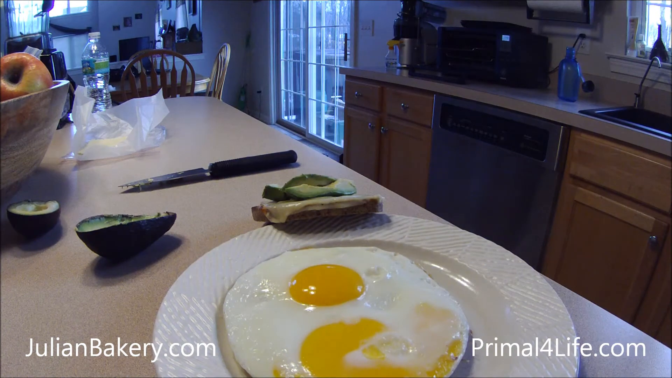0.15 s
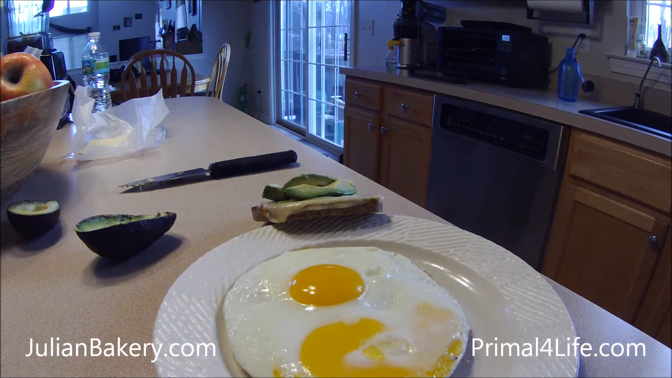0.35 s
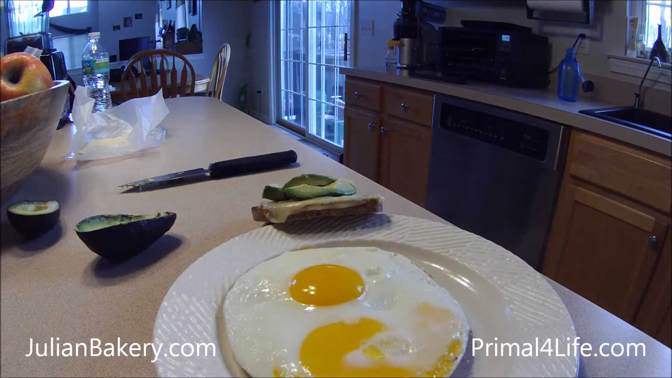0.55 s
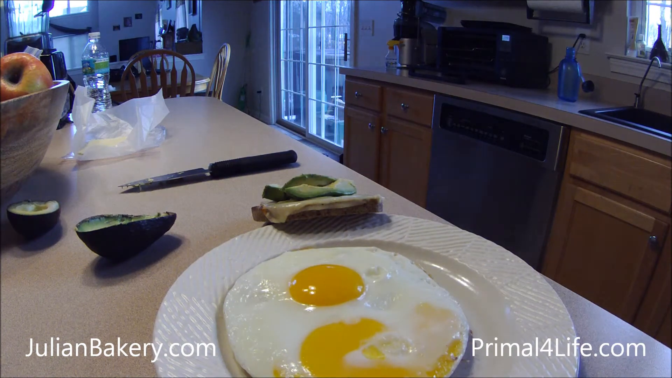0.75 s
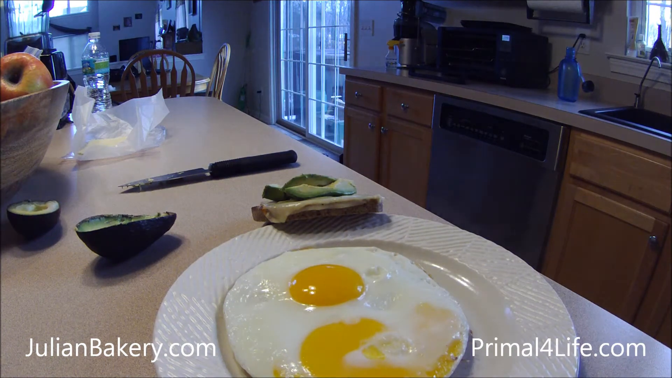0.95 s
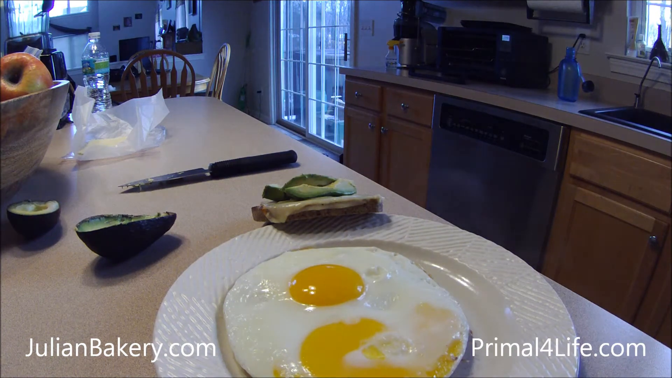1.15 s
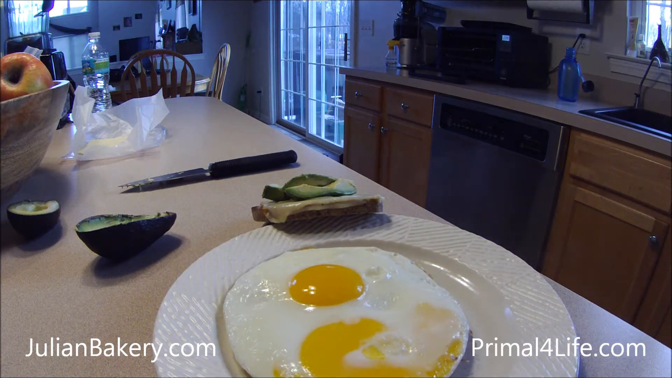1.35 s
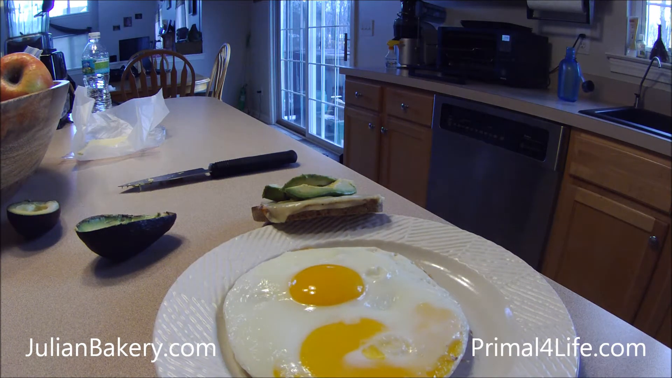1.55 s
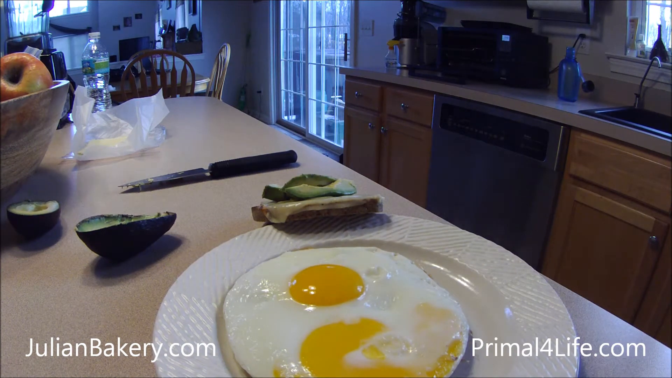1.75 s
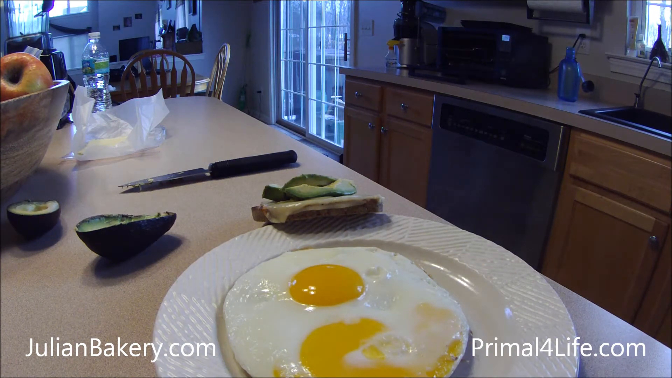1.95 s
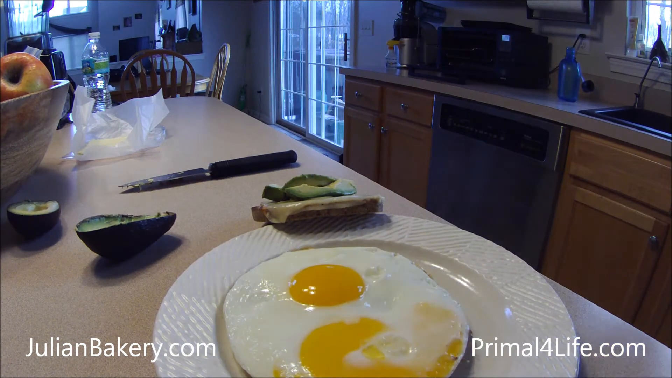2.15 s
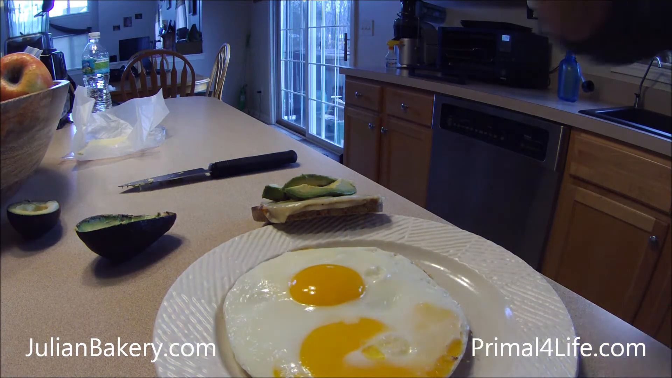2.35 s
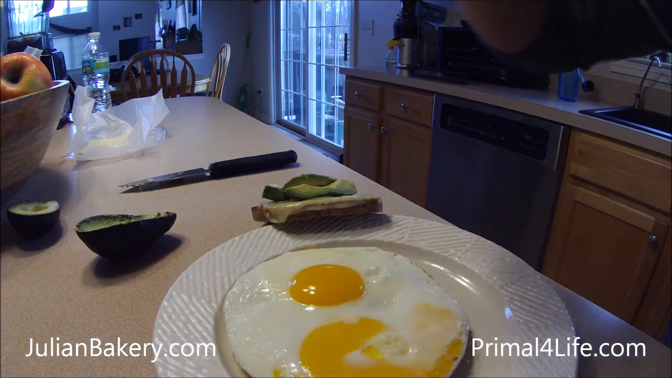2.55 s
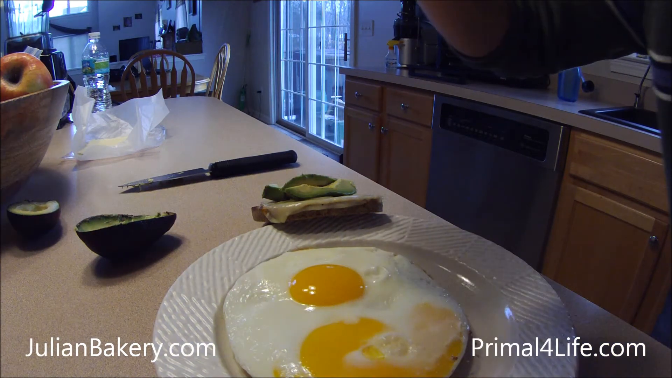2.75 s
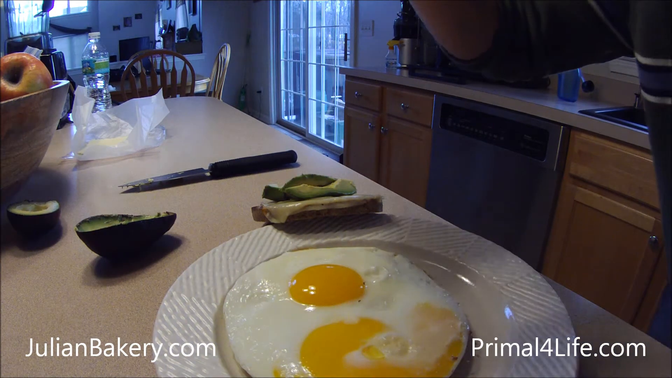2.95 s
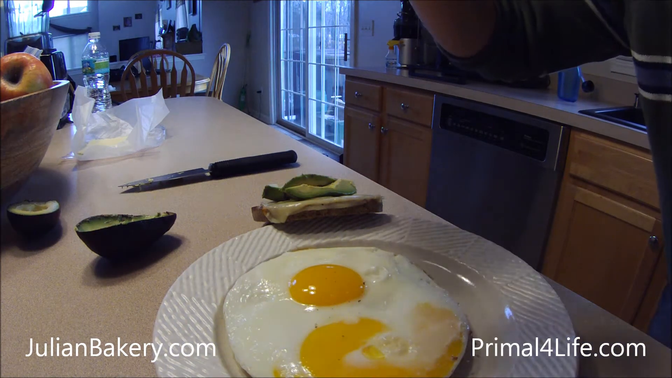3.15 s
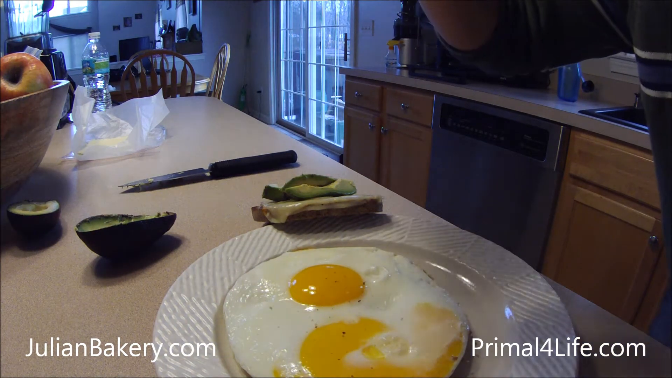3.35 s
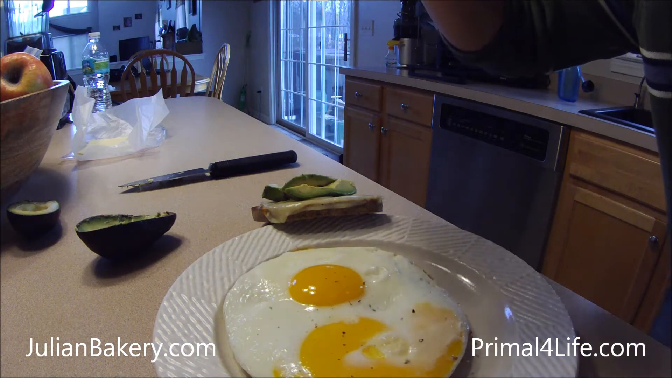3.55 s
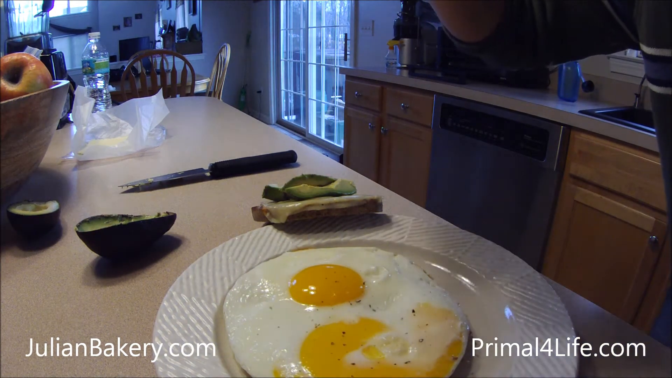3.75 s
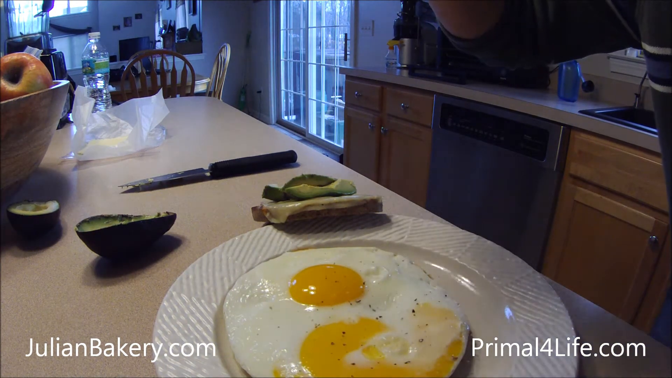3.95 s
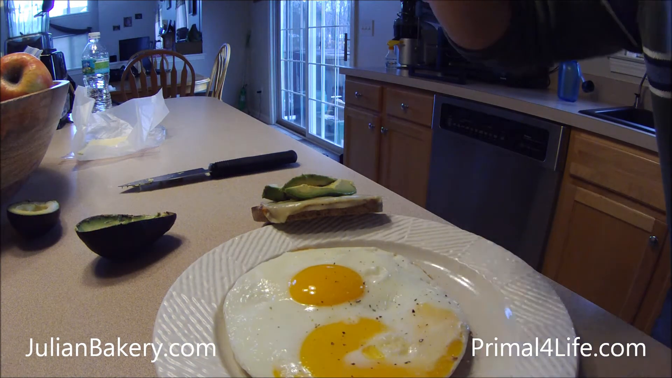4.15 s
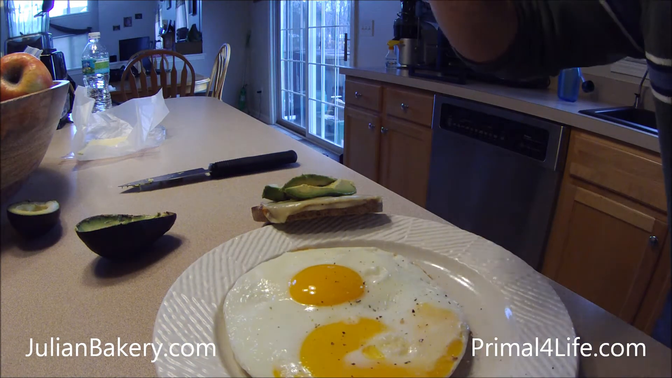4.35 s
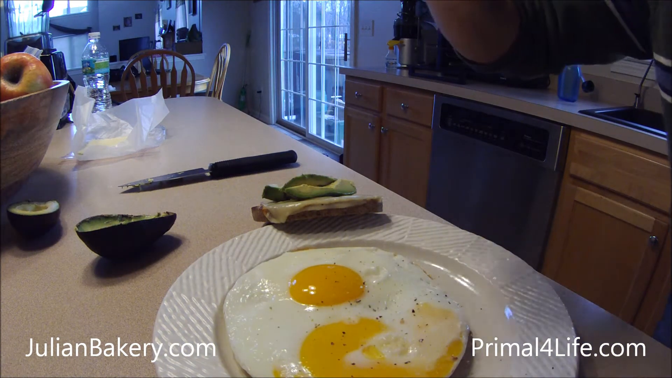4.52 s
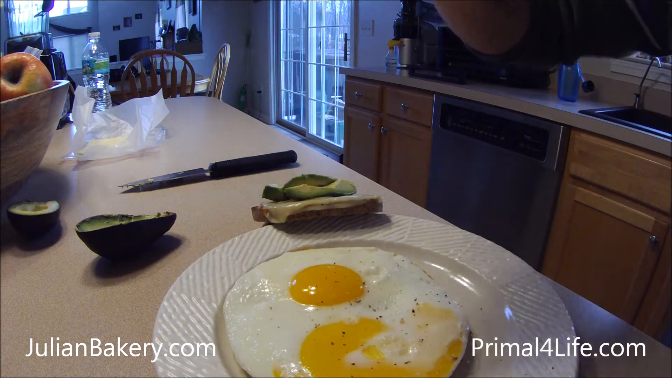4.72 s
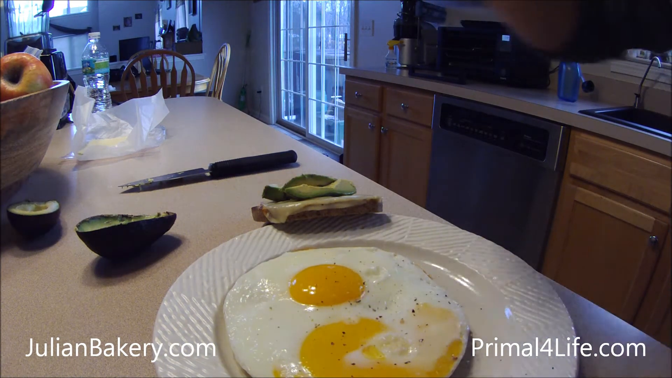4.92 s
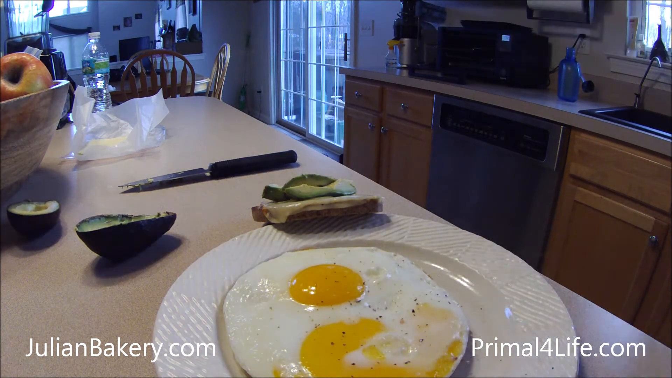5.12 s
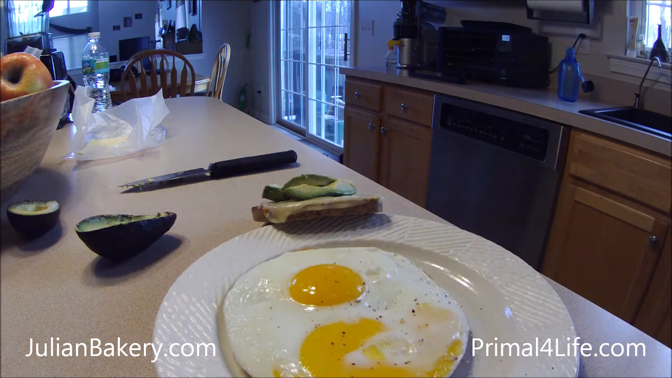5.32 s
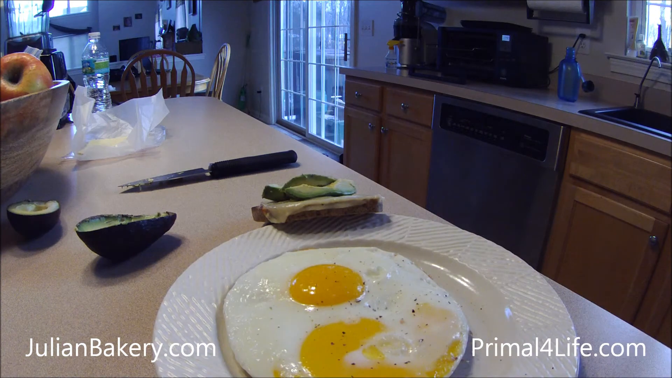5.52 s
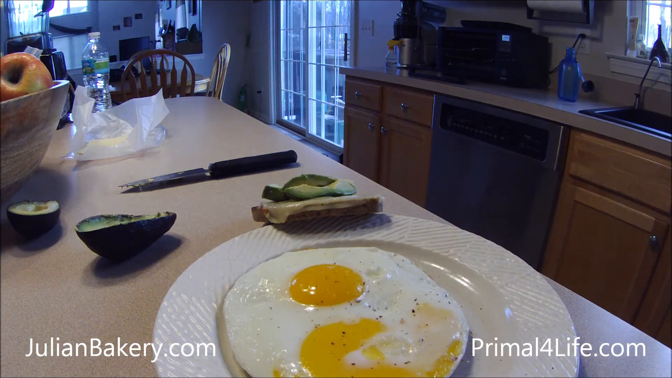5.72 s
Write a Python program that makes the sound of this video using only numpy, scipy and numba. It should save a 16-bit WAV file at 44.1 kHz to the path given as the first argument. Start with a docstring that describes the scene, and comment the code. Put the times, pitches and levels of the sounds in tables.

```python
"""Soft knocks come from across a small, fairly dry kitchen, where an appliance hums; then a pepper mill rasps close by.
Fried eggs are being seasoned: the mill is tipped, twisted in one long turn, shaken quickly and turned upright.
The knocks are noise bursts and fading tones; the hum is a few wavering tones over filtered noise.
The mill is made of countless tiny random impacts, which ring the resonances of its head and case.
Squeaks, cracking grains, a brushing sleeve and room reflections complete it."""
import sys
import numpy as np
from scipy import signal
from scipy.fft import rfft, irfft
from scipy.io import wavfile
from scipy.ndimage import uniform_filter1d, map_coordinates
from numba import njit

SR = 44100
rng = np.random.default_rng(int(sys.argv[2]) if len(sys.argv) > 2 else 0)


def digitize_waveform(pressure):
    """Quantize a signal to 16-bit integers and store it at the path in sys.argv[1].

    Rows of a 2-D input are taken as channels; values are limited to [-1, 1].
    """
    field = np.atleast_2d(pressure).T
    bounded = np.clip(field, -1, 1)
    quanta = np.round(bounded * 32767).astype(np.int16)
    wavfile.write(sys.argv[1], SR, quanta)


N = 254898
T = np.arange(N) / SR  # time of every sample, s

# shakes of the mill, a light backswing and a hard landing by turns:
# (t/s, hold/s, treble level/dB, then relative to it: body/dB, crisp top/dB, forerunning grains/dB;
# ring of the struck spot f/Hz, its relative level/dB); later trims shift the levels
SHAKE_STROKES = [(4.292, 0.012, -31, -10, -19, -20, 9300, -11),
                 (4.36, 0.018, -31.5, -5.5, -0.5, -10.5, 8800, -7),
                 (4.469, 0.02, -36, -8.5, -9, -7.5, 7900, -6),
                 (4.526, 0.026, -26, -4.5, -7, -19, 2460, -15),
                 (4.654, 0.011, -33.5, -6, -10, -19, 7900, -3),
                 (4.709, 0.017, -29, -3, -4, -6.5, 5100, -11),
                 (4.818, 0.02, -29.5, -11.5, -10, -16, 7700, -9),
                 (4.866, 0.033, -32, -1, -7, -13, 5040, -12)]


def undb(db):
    """Turn decibels into a gain."""
    return 10 ** (np.asarray(db) / 20)


def unit(x):
    """Scale a sound to rms 1."""
    return x / np.sqrt(np.mean(x ** 2))


def add(out, s, sound):
    """Mix a short sound in at time s."""
    i = max(int(s * SR), 0)
    out[i:i + len(sound)] += sound[:N - i]


def colour(x, points):
    """Shape the spectrum through (f/Hz, level/dB) points, with a filter that never rings ahead of the sound."""
    size = 4096
    hz, db = np.transpose(points)
    bins_hz = np.arange(size // 2 + 1) * SR / size
    log_gain = np.log(undb(np.interp(np.log(bins_hz + 1), np.log(hz), db)))
    # folding the cepstrum gives minimum phase
    cepstrum = irfft(log_gain)
    cepstrum[1:size // 2] *= 2
    cepstrum[size // 2 + 1:] = 0
    impulse = irfft(np.exp(rfft(cepstrum)))
    return signal.fftconvolve(x, impulse)[:len(x)]


@njit
def svf(x, hz, width):
    """State-variable band-pass whose centre may move every sample."""
    y, band, low = np.empty(len(x)), 0., 0.
    for i in range(len(x)):
        g = np.tan(np.pi * min(hz[i], .45 * SR) / SR)
        k = width / hz[i]
        v = (band + g * (x[i] - low)) / (1 + g * (g + k))
        band = 2 * v - band
        low = low + 2 * g * v
        y[i] = k * v
    return y


def resonate(x, hz, width):
    """Ring one resonance, fixed or moving, with gain 1 at its centre."""
    return svf(x + 1e-18, hz * np.ones(len(x)), float(width))


def walk(rate):
    """Wander smoothly and randomly with rms 1, passing `rate` random points a second."""
    knots = rng.standard_normal(2048)
    return unit(map_coordinates(knots, [T * rate], order=2, mode="wrap"))


def grains(per_s, scatter_db):
    """Tiny random impacts of uneven size; their power stays about 1 as the rate changes."""
    chance = np.clip(per_s / SR, 1e-4, 1)
    spread = np.clip(rng.standard_normal(N), -2, 2)
    sizes = unit(rng.choice([-1, 1], N) * undb(scatter_db * spread))
    return sizes * (rng.random(N) < chance) / np.sqrt(chance)


def chatter(hz, width):
    """Dense tiny contacts ring one resonance, rms 1."""
    contacts = grains(3000, scatter_db=2.5)
    return unit(resonate(resonate(contacts, hz, width), hz, 2 * width))


def background(tone_db=-55.0, flutter_per_s=20):
    """Steady room air and hiss are filtered noise; the appliance hums in wavering tones."""
    # spectrum of the room air: (f/Hz, relative level/dB)
    room_tone = [(15, -22), (25, -42), (43, -24), (116, -15), (193, -14.5), (227, -5.5), (260, -8.5),
                 (349, -11.5), (410, -16), (445, -13.5), (1170, -25), (1270, -23), (1410, -25.5),
                 (3830, -30), (15500, -38)]
    # appliance hum: (f/Hz, level/dB, unsteadiness 0-1)
    hum = [(59.2, -81, 0.3), (118.4, -72.5, 0.02), (225.6, -57, 0.57), (285, -73, 0.57), (449, -69, 0.8)]
    out = undb(tone_db) * unit(colour(rng.standard_normal(N), room_tone))
    for hz, db, unsteady in hum:
        wander = walk(flutter_per_s) + 1j * walk(flutter_per_s)  # sways both strength and phase
        swing = 1 - unsteady + unsteady * wander
        out = out + undb(db) * unit(np.real(swing * np.exp(2j * np.pi * hz * T)))
    return out


def knocks(thud_db=-2, thud_s=0.012, contact_s=0.0023, panel_db=-1,
           clack_hz=800, clack_width=600, clack_s=0.012,
           rattle_hz=1750, rattle_width=750, rattle_s=0.027):
    """Soft blows on wooden cupboards: a dull thud, a hollow clack, the panel's short ring and a loose door's rattle."""
    # blows: (t/s, level/dB, hardness: treble tilt/dB per octave,
    # panel ring/dB, hollow clack/dB, rattle/dB); the parts are relative levels ahead of the thud and panel trims
    blows = [(.008, -49, -2, 2, 3.5, -26), (.68, -56.5, 1.5, 5.5, -10, -9),
             (1.1863, -43, 2.5, -5, -17, -11), (1.1932, -29, -1.6, 0, -18, -16.5),
             (1.228, -49, -4, 0, -20, -18), (1.419, -47, 3, 3.5, 2, -5.5)]
    # tones of the cupboard panel: (f/Hz, relative level/dB, fall by 60 dB/s)
    panel_tones = [(249.6, -2.5, 0.12), (287, 2, 0.063), (338, -19, 0.044), (439.5, -1, 0.097),
                   (465, -7, .11), (586, -10.5, 0.096), (862, -13, 0.074), (1126, -12, 0.1),
                   (1387, -13.5, 0.12), (1597, -16, 0.15), (1710, -14, .16), (2000, -28, 0.12),
                   (2730, -19, 0.04)]
    # spectrum of the thud ahead of the hardness tilt: (f/Hz, relative level/dB)
    thud_bands = [(170, -45), (235, 2.5), (320, -3.5), (480, 0), (650, -14), (1000, -8.5), (1900, -17),
                  (3000, -21), (6000, -27), (11000, -36), (16000, -42)]
    out, t = np.zeros(N), T[:SR // 2]
    for s, db, hard_db, ring_db, clack_db, rattle_db in blows:
        ring = 0
        for hz, mode_db, t60 in panel_tones:
            gain = undb(mode_db + hard_db * np.log2(hz / 400))
            ring = ring + gain * np.sin(2 * np.pi * hz * t) * np.exp(-np.log(1000) * t / t60)
        # the tilt stops growing above 2 kHz
        tilted = [(hz, band_db + hard_db * np.log2(min(hz, 2000) / 400)) for hz, band_db in thud_bands]
        thud = unit(colour(rng.standard_normal(len(t)), tilted)) * np.exp(-t / thud_s)
        clack = undb(clack_db) * chatter(clack_hz, clack_width)[:len(t)] * np.exp(-t / clack_s)
        rattle = undb(rattle_db) * chatter(rattle_hz, rattle_width)[:len(t)] * np.exp(-t / rattle_s)
        blow = undb(ring_db + panel_db) * ring + undb(thud_db) * thud + clack + rattle
        soft_start = 1 - np.exp(-t / contact_s)
        add(out, s, undb(db) * blow * soft_start)
    return out


def kitchen(x, t60=0.37, treble_t60=0.13):
    """Diffuse reflections from cupboards and walls: fading noise whose treble dies first."""
    t = T[:SR // 2]
    noise = rng.standard_normal(len(t))
    low = signal.sosfilt(signal.butter(1, 3000, fs=SR, output="sos"), noise)
    low_tail = low * np.exp(-np.log(1000) * t / t60)
    treble_tail = (noise - low) * np.exp(-np.log(1000) * t / treble_t60)
    tail = (low_tail + treble_tail) * (t > .004)  # reflections arrive after 4 ms
    return signal.fftconvolve(x, tail / np.sqrt(np.sum(tail ** 2)))[:N]


def surge(s, db, rise, fall):
    """Power of one swell, such as a throw of grains: it peaks at time s and dies away."""
    distance = (T - s) / np.where(T < s, rise, fall)
    return undb(db) ** 2 * np.exp(-np.minimum(distance ** 2, 10 * 10))


def sleeve(level_db=-42.0, at_s=5.116, rise_s=0.004, fall_s=0.042):
    """Cloth brushes past as the arm draws back: dense soft contacts in one swell."""
    # spectrum of the cloth: (f/Hz, relative level/dB)
    cloth = [(100, -22), (300, -11), (600, -9.5), (900, -4.5), (1350, 0.5), (1800, -2.5), (2500, -4),
             (6000, -25)]
    brush = unit(colour(grains(2500, scatter_db=0.5), cloth))
    return np.sqrt(surge(at_s, level_db, rise_s, fall_s)) * brush


def loose_grains(stir, level_db, per_s, ring_hz, ring_width, stray_s=0.056, click_s=0.0011):
    """Lone grains click at random wherever the load is stirred, a little ahead of and behind the bulk."""
    t = T[:SR // 100]
    hits = grains(per_s, scatter_db=-1.0)
    click_power = signal.fftconvolve(hits ** 2, np.exp(-2 * t / click_s))[:N]
    clicks = resonate(np.sqrt(np.abs(click_power)) * rng.standard_normal(N), ring_hz, ring_width)
    return undb(level_db) * uniform_filter1d(stir, int(stray_s * SR)) * unit(clicks)


def landing(s, hold_s, db, attack_s=0.0018, release_s=0.0096):
    """Strength of the bulk of the grains landing: attack, hold, release."""
    before = np.maximum(s - T, 0) / attack_s
    after = np.maximum(T - s - hold_s, 0) / release_s
    return undb(db) * np.exp(-before - after)


def throws(fall_over_swell=1.18, forerun_s=0.012):
    """Power of the grains' spray (treble), thump on the case (body) and crisp top, over tilts, jolts and shakes."""
    # slides of grains as the mill is tilted, and single short jolts that throw them (2.561, 2.729, 4.173 s):
    # (t/s, treble level/dB, swell/s, then relative to the treble: body/dB, crisp top/dB); later trims shift the levels
    tilts_and_jolts = [(1.925, -57, 0.03, -4.5, -22), (2.112, -49.5, 0.03, -8, -15),
                       (2.401, -32, 0.025, -11, -17), (2.456, -34, 0.013, -2.5, 2),
                       (2.5, -34.5, 0.017, -10, -6), (2.561, -29.5, 0.024, -6.5, -4),
                       (2.729, -37.5, 0.01, -2.5, 0), (4.173, -33, 0.007, -2, -1.5),
                       (5.04, -43, 0.046, -8, -9), (5.146, -37.5, 0.043, -4.5, -9)]
    strokes = []
    for s, db, swell_s, body_db, top_db in tilts_and_jolts:
        power = surge(s, db, swell_s, fall_over_swell * swell_s)  # falls a little slower than it swells
        strokes.append((power, body_db, top_db))
    for s, hold_s, db, body_db, top_db, forerun_db, _, _ in SHAKE_STROKES:
        bulk = landing(s, hold_s, db)
        # the first grains arrive ahead of the bulk
        forerun = surge(s, db + forerun_db, forerun_s, forerun_s)
        strokes.append((bulk ** 2 + forerun, body_db, top_db))
    return sum(np.outer(undb([0, body_db, top_db]) ** 2, power) for power, body_db, top_db in strokes)


def shaking(body_db=-1, treble_db=-1.0, top_db=-1, trickle_per_s=3200, surge_per_s=110000,
            settle_s=0.13, settle_share=0.026, hard_throw_db=-27,
            ring_sway_db=2.5, detune=0.027, clump_db=4):
    """Tilts, jolts and strokes drive the grains against the case; the harder they do, the more land at once."""
    # spectra of the case, its body and its treble: (f/Hz, relative level/dB)
    case_body = [(300, -18), (800, -21.5), (1080, -16.5), (1280, -1), (1750, 1.5), (2100, -3.5), (2600, 1),
                 (3100, 0), (3700, 5), (4600, -6.5), (7000, -32)]
    case_treble = [(1500, -35), (3200, -12.5), (4200, -4), (6500, 0.5), (8400, 1), (10000, 0.5),
                   (12000, -8), (15500, -6)]
    # crisp top of head-on impacts: (f/Hz, relative level/dB)
    case_top = [(5000, -36), (9000, -16), (10500, -2), (12500, -1), (13400, 6.5), (15500, -1)]
    # ringing of the case: (centre f/Hz, width/Hz, relative level/dB)
    case_ring = [(1320, 300, 0), (1740, 57, -2), (2610, 230, 6), (3500, 320, -5), (4980, 145, 3),
                 (5970, 180, -3.5), (7290, 110, 4), (8040, 130, -1.5), (8350, 320, 1.5), (10250, 110, -20)]

    # stragglers keep trickling after the bulk has landed, more than in proportion after a strong throw
    keep = np.exp(-1 / (settle_s * SR))
    strengths = []
    for power in throws():
        scattered = power * (power / undb(hard_throw_db) ** 2) ** 0.18
        stragglers = signal.lfilter([1 - keep], [1, -keep], scattered + 1e-18)
        strengths.append(np.sqrt(power + settle_share * stragglers))
    treble, body, top = strengths

    # they land in clumps a few milliseconds long
    hits = grains(trickle_per_s + surge_per_s * treble, scatter_db=1.5)
    hits = hits * undb(clump_db * np.tanh(walk(420)))

    # the shifting load sways the strength and pitch of the case's resonances
    rung = hits
    for hz, width, db in case_ring:
        sway = undb(db + ring_sway_db * walk(15))
        rung = rung + sway * resonate(hits, hz * (1 + detune * walk(11)), width)

    # head-on impacts shake the body and add a crisp top; glancing ones only hiss
    crisp = unit(colour(hits * rng.choice([-1, 1], N), case_top))
    thump = undb(body_db) * body * unit(colour(rung, case_body))
    head_on = thump + undb(top_db) * top * crisp
    glancing = undb(treble_db) * treble * unit(colour(rung, case_treble))
    strays = loose_grains(treble, level_db=-10.5, per_s=170, ring_hz=7950, ring_width=13000)
    return glancing + head_on + strays


def struck_spots(level_db=-1, width=700, skid_width=2800):
    """Each stroke rings the spot of the case that it strikes; the grains skid back in between."""
    # skids between strokes and as the mill is righted: (t/s, level/dB, swell/s, ring f/Hz)
    skids = [(4.135, -59, .012, 8800), (4.275, -55, 0.0056, 8950), (4.457, -38.5, .005, 8600),
             (4.636, -43, 0.0066, 8600), (4.79, -53, 0.0061, 8250), (5.03, -48, 0.045, 8300),
             (5.106, -39, 0.0034, 7500)]
    out = np.zeros(N)
    for s, hold_s, db, _, _, _, hz, ring_db in SHAKE_STROKES:
        out += undb(ring_db + level_db) * landing(s, hold_s, db) * chatter(hz, width)
    for s, db, swell_s, hz in skids:
        out += np.sqrt(surge(s, db, swell_s, swell_s)) * chatter(hz, skid_width)
    return out


def ticks(crack_s=0.00067, crack_spread=0.59, ring_s=0.0055, ring_db=-19, ring_width=900,
          crunch_s=0.0018, crunch_hz=1900, crunch_width=4200):
    """A hard grain gives a tiny crack and a brief ring; a crushed one also crunches lower down."""
    # the hardest grains, striking the case or cracking in the mill:
    # (t/s, peak level/dB, ring f/Hz, low-reaching crunch relative to the crack/dB)
    hard_grains = [(2.081, -37, 7040, -12), (2.124, -31, 7200, -17), (2.171, -43, 10000, -18),
                   (2.4313, -19, 8500, -25), (2.434, -10, 8750, -34), (2.4385, -16, 10500, -25),
                   (2.458, -25, 11000, -19), (2.4638, -15, 8200, -14), (2.4745, -20, 9100, -23),
                   (2.552, -16.5, 4900, -7.5), (2.557, -18.5, 11000, -16), (2.8945, -16, 2810, -4),
                   (2.919, -15.5, 3600, -10), (3.131, -20.5, 5000, -1), (3.341, -17.5, 4380, -16),
                   (3.455, -19, 2660, 10), (3.473, -21.5, 3000, 0), (3.524, -26, 5930, -18),
                   (3.5903, -19.5, 5400, -23), (3.6779, -17, 5200, -1), (4.039, -31, 4960, -7),
                   (4.152, -30, 11200, -10), (4.289, -27, 7500, -20), (4.352, -27, 11500, -24),
                   (4.3565, -29, 5040, -8), (4.361, -22, 10900, -26), (4.3695, -29, 10400, -28),
                   (4.374, -14.5, 8400, -30), (4.4, -22, 9500, -6.5), (4.42, -27, 6400, -8),
                   (4.47, -19, 8000, -24), (4.479, -25, 7500, -20), (4.515, -25, 8000, -5),
                   (4.5256, -15.5, 2660, -20), (4.526, -17, 7000, -19), (4.535, -21, 6200, -13),
                   (4.545, -17, 9450, -18), (4.552, -11, 8800, -20), (4.64, -24, 8500, -22),
                   (4.655, -21, 7960, -22), (4.66, -18.5, 7900, -21), (4.69, -23, 7000, -15),
                   (4.71, -17, 5000, -22), (4.718, -12.5, 9600, -22), (4.809, -19.5, 9500, -18),
                   (4.864, -29, 4530, -13), (4.8865, -15, 11600, -21), (4.89, -6, 7950, -23),
                   (4.892, -7, 8260, -31), (4.895, -14, 7600, -22), (4.939, -29.5, 4200, -5),
                   (4.986, -22, 8500, -32)]
    out, t = np.zeros(N), T[:SR // 25]
    high_pass = signal.butter(4, 1300, "high", fs=SR, output="sos")
    for s, db, hz, crunch_db in hard_grains:
        crack_width = crack_spread * hz
        crack = signal.sosfilt(high_pass, rng.standard_normal(len(t)) * np.exp(-t / crack_s))
        crack = resonate(resonate(crack, hz, crack_width), hz, 2 * crack_width)
        crunch = rng.standard_normal(len(t)) * np.exp(-t / crunch_s)
        crunch = resonate(resonate(crunch, crunch_hz, crunch_width), crunch_hz, crunch_width)
        ring = unit(resonate(rng.standard_normal(len(t)), hz, ring_width)) * np.exp(-t / ring_s)
        tick = crack / np.abs(crack).max() + undb(ring_db) * ring
        tick = tick + undb(crunch_db) * crunch / np.abs(crunch).max()
        add(out, s, undb(db) * tick / np.abs(tick).max())
    return out


def squeaks(width=100):
    """The rubbing faces sing briefly: narrow airy bands of noise glide in an arc and fade."""
    # the clearest squeaks: (start t/s, end t/s, start f/Hz, middle f/Hz, end f/Hz, relative level/dB)
    arcs = [(2.76, 2.88, 6500, 6400, 6750, -9), (2.801, 2.99, 3150, 3470, 3420, -7),
            (2.797, 2.9, 7600, 7750, 7700, -14), (2.81, 2.914, 4480, 4470, 4360, -7.5),
            (2.818, 2.912, 9900, 9980, 10050, -17), (2.889, 3.033, 5320, 5410, 5360, -5.5),
            (2.918, 3.108, 4800, 4290, 4100, -10.5), (2.96, 3.096, 6620, 6390, 6200, -15),
            (2.977, 3.12, 5360, 5120, 5430, -10), (3.142, 3.282, 6200, 6440, 6250, -10.5),
            (3.16, 3.25, 8600, 8730, 8700, -21), (3.17, 3.26, 10300, 10450, 10400, -19),
            (3.188, 3.426, 2780, 2900, 2960, -5.5), (3.235, 3.4, 3550, 3750, 3800, -13),
            (3.268, 3.42, 6500, 6390, 6250, -15), (3.28, 3.45, 10100, 10050, 9880, -26),
            (3.386, 3.493, 5340, 5040, 4450, -3.5), (3.49, 3.61, 5070, 5310, 5200, -2.5),
            (3.5, 3.61, 4150, 4220, 4100, -7), (3.529, 3.722, 2930, 3060, 3100, -7),
            (3.602, 3.67, 4950, 4800, 4650, -13), (3.652, 3.8, 5560, 5130, 5000, -13),
            (3.761, 3.99, 3100, 3010, 3030, -6), (3.784, 3.977, 1300, 1444, 1580, -7)]
    out = np.zeros(N)
    for start, end, hz0, hz1, hz2, db in arcs:
        along = np.linspace(0, 1, max(int((end - start) * SR), SR // 100))
        hz = np.polyval(np.polyfit([0, .5, 1], [hz0, hz1, hz2], 2), along)
        noise = rng.standard_normal(SR)[:len(along)]
        band = resonate(resonate(noise, hz, width), hz, 3 * width)
        add(out, start, undb(db) * unit(band) * np.sin(np.pi * along))
    return out


def grinding(level_db=-0.3, treble_db=4.5, low_db=-1, low_width=190, whistle_db=-16.0, whistle_width=300,
             rasp_db=-10.5, wander_hz=40, flicker_db=1.0, edge_hz=1250, stop_db=-8, slowing_s=0.11,
             start_s=2.715, end_s=4.1, ease_s=0.067):
    """Dense rubbing contacts ring the mill head, whose resonances slide as it turns in the hand."""
    # the turn, ahead of the level and treble trims: (t/s, level/dB, relative treble/dB)
    turn = [(2.75, -39.5, -13), (2.778, -35, -9.5), (2.85, -35.5, -7), (2.93, -34.5, -5), (3.03, -35, -5),
            (3.25, -35, -2.5), (3.39, -34, -5), (3.56, -36.5, -5), (3.85, -33.5, -6), (3.95, -35.5, -5),
            (4.046, -43, -9), (4.06, -56, -20), (4.08, -68, -5)]
    # the shifting grip squeezes the hollow around the head: (t/s, shift of its resonances as a share)
    grip_shift = [(2.78, 0.034), (2.86, 0.0066), (2.97, 0.017), (3.07, -0.056), (3.14, 0.0053),
                  (3.23, 0.015), (3.32, -0.018), (3.4, 0.011), (3.47, -0.049), (3.515, -0.0029),
                  (3.58, 0.022), (3.63, -0.023), (3.68, -0.0052), (3.77, -0.014), (3.87, -0.0035),
                  (4.0, -0.041)]
    # the head's lowest resonance slides: (t/s, f/Hz)
    low_slide = [(2.76, 1590), (2.962, 1490), (2.988, 1610), (3.486, 1524), (3.59, 1740), (3.786, 1520),
                 (3.846, 1440), (4.04, 1630)]
    # the head's highest whistle wavers: (t/s, f/Hz)
    whistle = [(2.81, 11100), (2.9, 11550), (2.98, 10900), (3.08, 10800), (3.13, 11200), (3.24, 10900),
               (3.32, 11100), (3.42, 11000), (3.47, 11400), (3.57, 11000), (3.87, 11100), (4.0, 10900)]
    # the other resonances of the head: (centre f/Hz, width setting/Hz, relative level at mid-turn/dB,
    # gain/dB per s, share of the grip's shift that they follow)
    head = [(1740, 210, -17.5, -4, 0.14), (2214, 220, -3.5, -1, 0.78), (2800, 123, -7, -2, 0.85),
            (3075, 204, -4.5, 3.5, 0.81), (3660, 170, -10.5, -2.5, 1.1), (4120, 104, -10.5, 8, 0.79),
            (5200, 180, -8, 0, 0.61), (5810, 180, -12, -1, 1.2), (6390, 150, -9.5, -1, 1.2),
            (7430, 460, -15.5, 0, 0.87), (8400, 600, -22, -1, 0.41), (9620, 200, -23, 7, 0.58),
            (10230, 240, -21.5, 1, 0.5), (14200, 1500, -27.5, 4, 0)]
    # spectrum of the dry rasp: (f/Hz, relative level/dB)
    rasp_bands = [(150, -30), (250, -14), (340, -3), (600, -5.5), (1000, -3.5), (1400, 2.5), (3000, -10),
                  (4600, -3.5), (6500, -3.5), (9000, -15), (12500, -19.5), (15500, -22)]

    turn_s, turn_db, turn_bright_db = np.transpose(turn)
    db = np.interp(T, turn_s, turn_db)
    bright_db = np.interp(T, turn_s, turn_bright_db)
    grip = np.interp(T, *np.transpose(grip_shift))
    from_middle_s = np.clip(T, start_s, end_s) - (start_s + end_s) / 2

    modes = [(np.interp(T, *np.transpose(low_slide)), low_width, low_db),
             (np.interp(T, *np.transpose(whistle)), whistle_width, whistle_db)]
    for hz, width, mode_db, db_per_s, follow in head:
        moving_hz = hz * (1 + follow * grip) + wander_hz * walk(11)
        modes.append((moving_hz, width, mode_db + db_per_s * from_middle_s))

    rings = 0
    for hz, width, mode_db in modes:
        rub = grains(3000, scatter_db=3) * undb(mode_db + flicker_db * walk(12))
        # two passes narrow the band, so each one is set wider
        rings = rings + resonate(resonate(rub, hz, 2.44 * width), hz, 2.44 * width)
    # so small a body radiates little below its lowest resonance
    rings = signal.sosfilt(signal.butter(4, edge_hz, "high", fs=SR, output="sos"), rings)
    rasp = unit(colour(grains(4000, scatter_db=2.5), rasp_bands))
    sound = unit(rings) + undb(rasp_db) * rasp + squeaks()

    # the rasp's brightness drifts on its own course through the turn; it dulls as the turn slows to a stop
    bright_db = bright_db + stop_db * np.clip(1 - (end_s - T) / slowing_s, 0, 1)
    dull = signal.sosfiltfilt(signal.butter(2, 4200, fs=SR, output="sos"), sound)
    sound = dull + (sound - dull) * undb(bright_db + treble_db)

    turning = np.clip(np.minimum(T - start_s, end_s - T) / ease_s, 0, 1)
    strength = undb(db + level_db) * turning
    strays = loose_grains(strength, level_db=-15.5, per_s=28, ring_hz=4250, ring_width=2100)
    return sound * strength + strays


def scene():
    """The mill is near and dry, the knocks far and roomy; only a faint hiss differs between the channels."""
    near = shaking() + struck_spots() + grinding() + ticks() + sleeve()
    far = knocks()
    room = kitchen(undb(-12.0) * near + undb(-4.5) * far)
    mid = near + far + room + background()
    hiss_bands = [(100, -23), (250, -14), (500, 4.5), (1000, -5.0), (15000, -11.5)]  # (f/Hz, relative level/dB)
    side = undb(-75.0) * unit(colour(rng.standard_normal(N), hiss_bands))
    return np.array([mid + side, mid - side])


def record(dry):
    """A steep low-pass cuts the top of the treble above 15.6 kHz."""
    return signal.sosfilt(signal.ellip(10, .2, 70, 15600, fs=SR, output="sos"), dry)


dry = scene()
out = record(dry)
digitize_waveform(out)
```